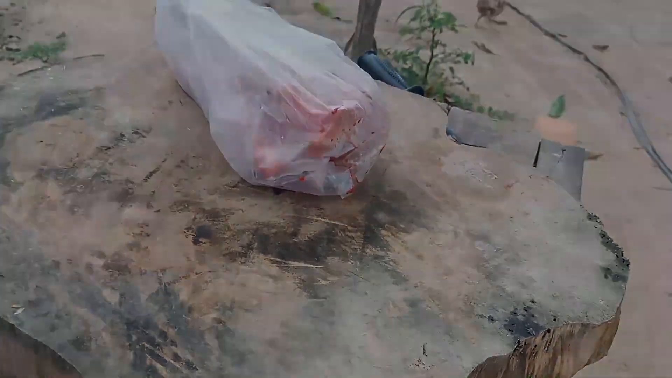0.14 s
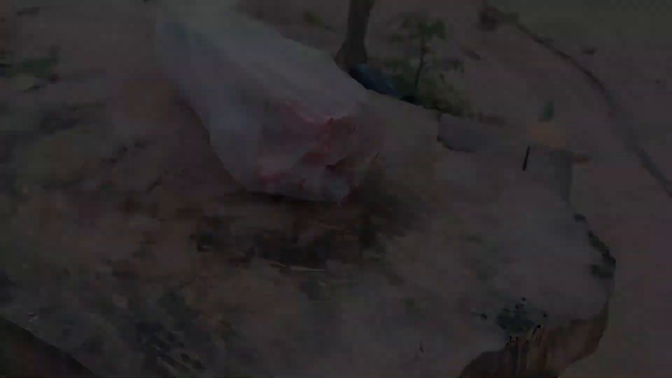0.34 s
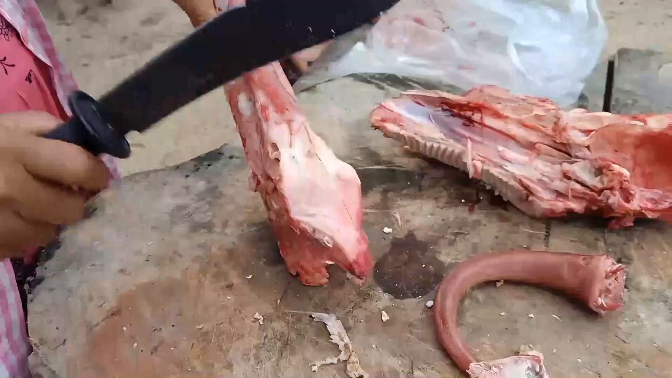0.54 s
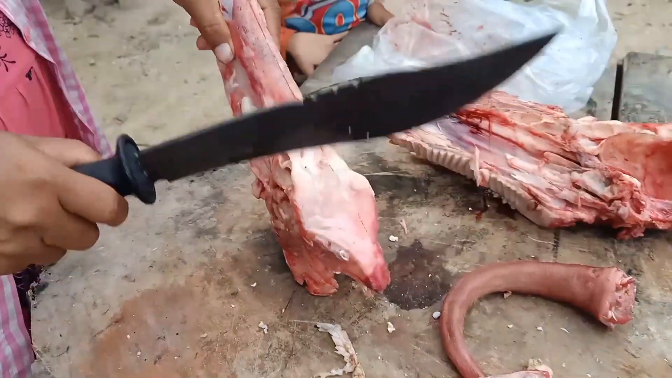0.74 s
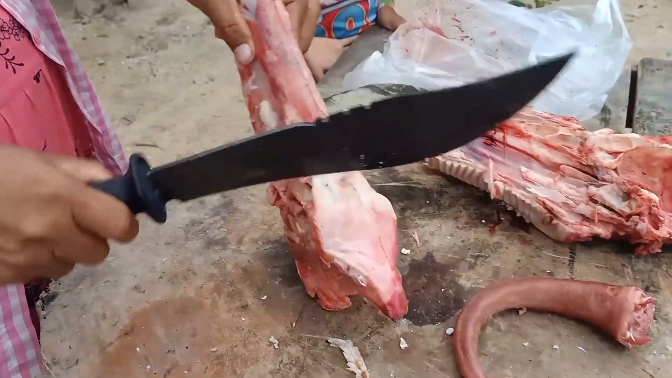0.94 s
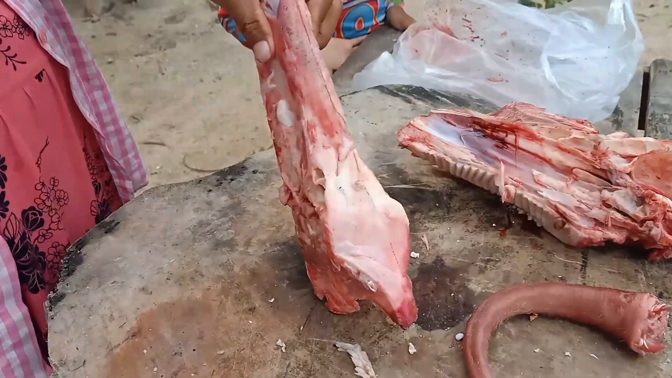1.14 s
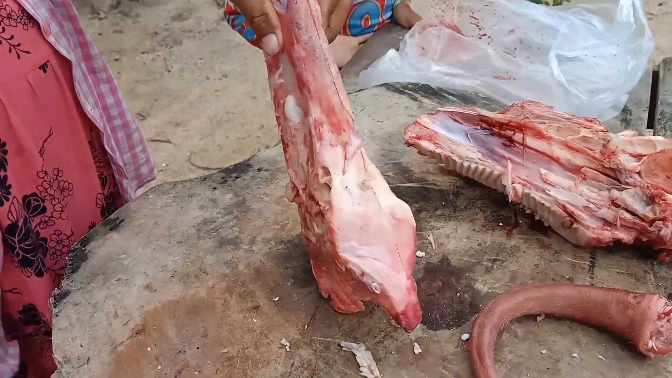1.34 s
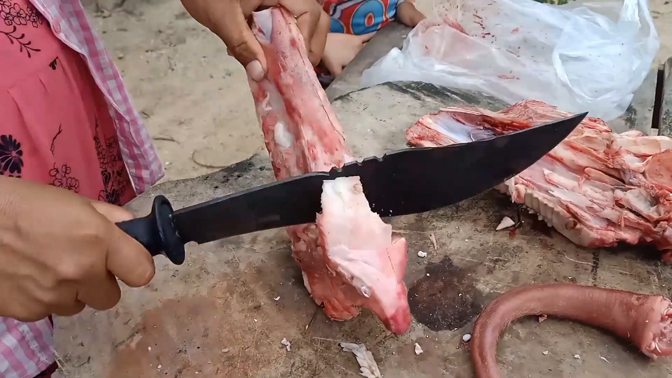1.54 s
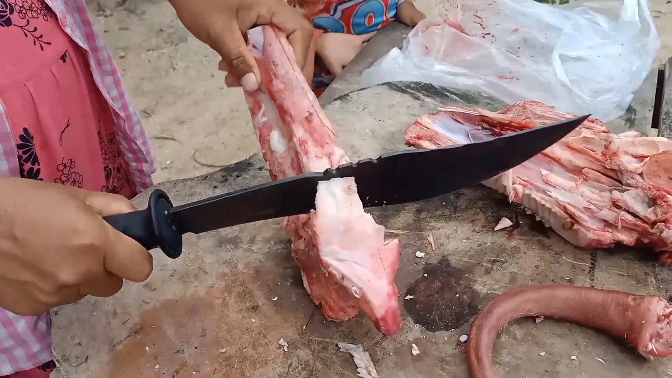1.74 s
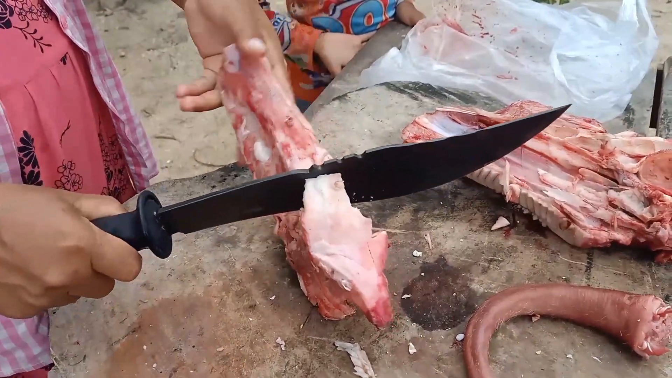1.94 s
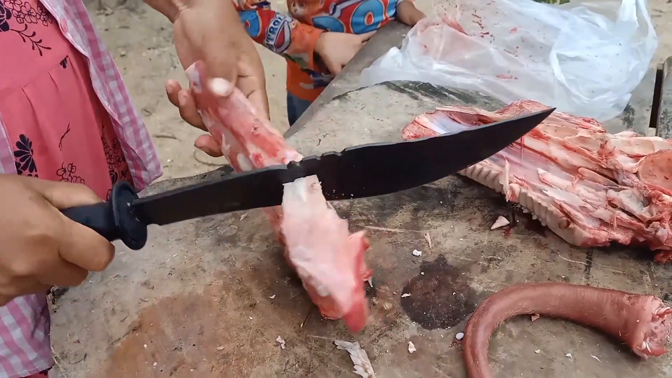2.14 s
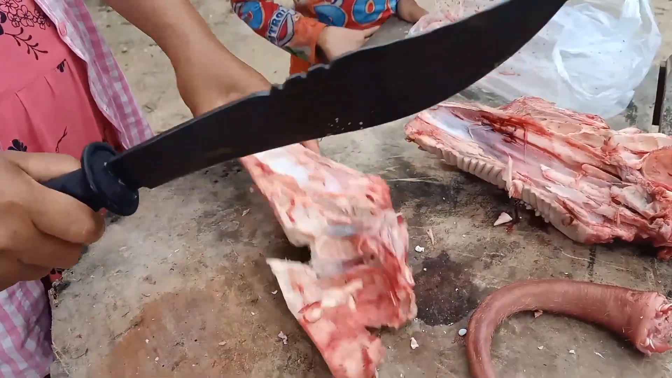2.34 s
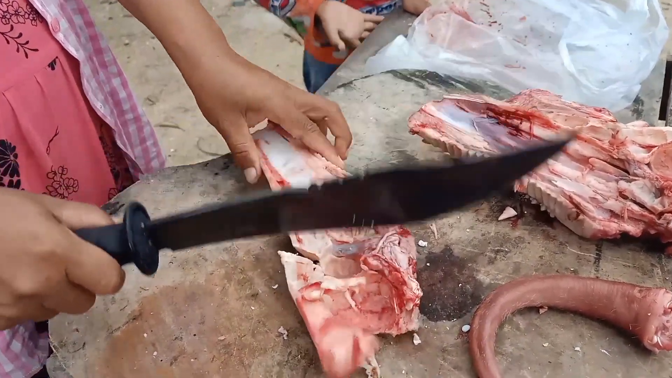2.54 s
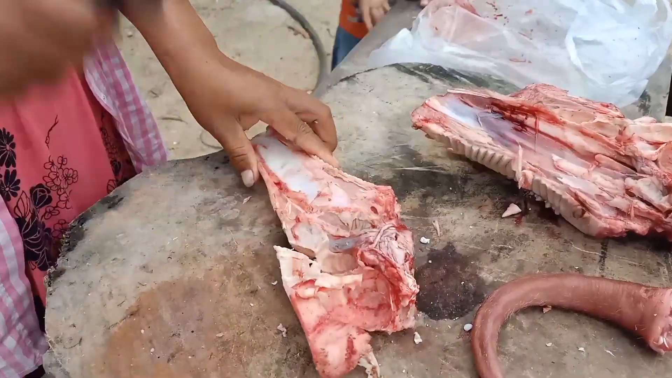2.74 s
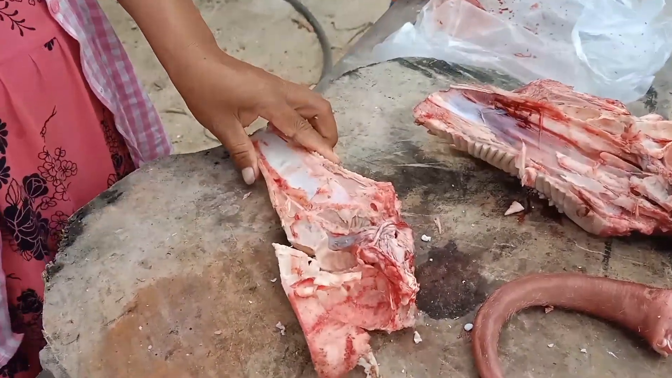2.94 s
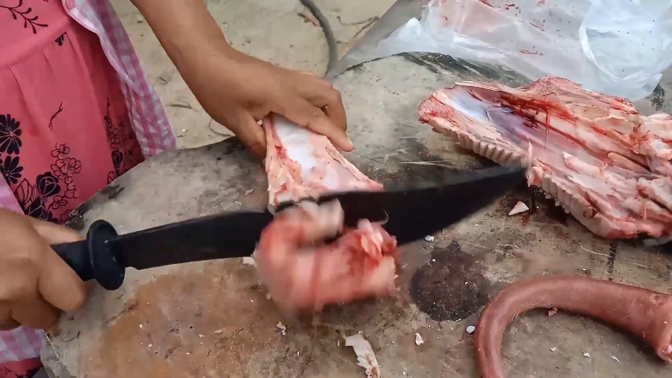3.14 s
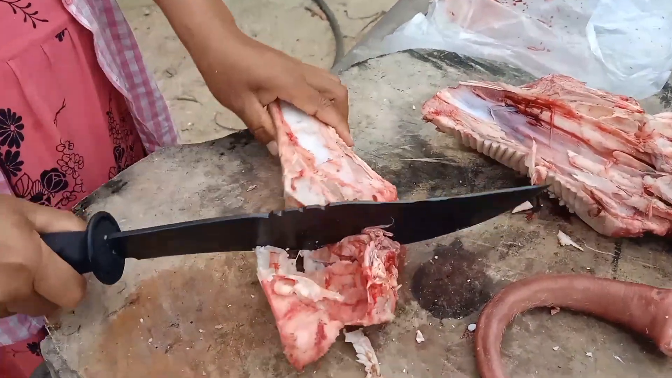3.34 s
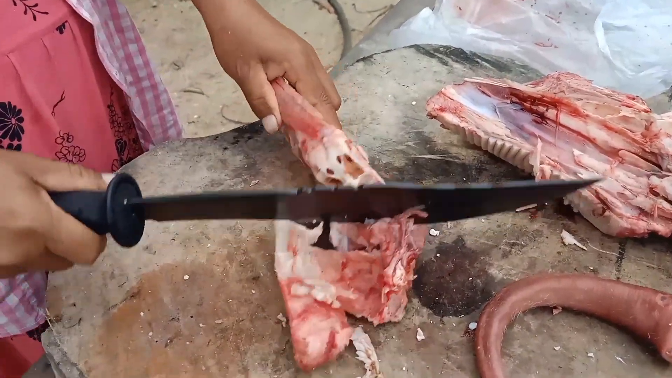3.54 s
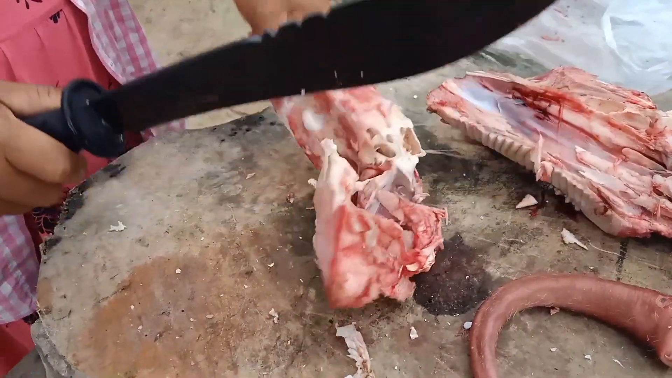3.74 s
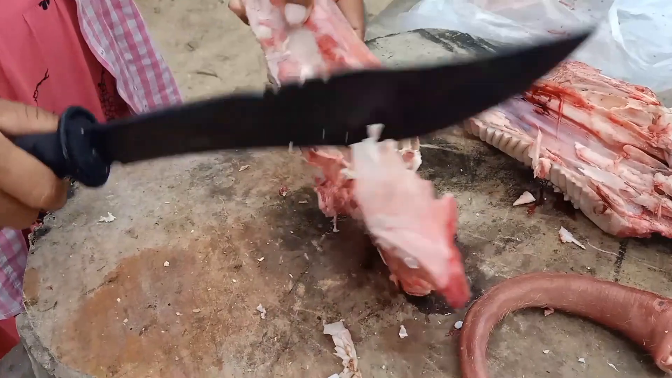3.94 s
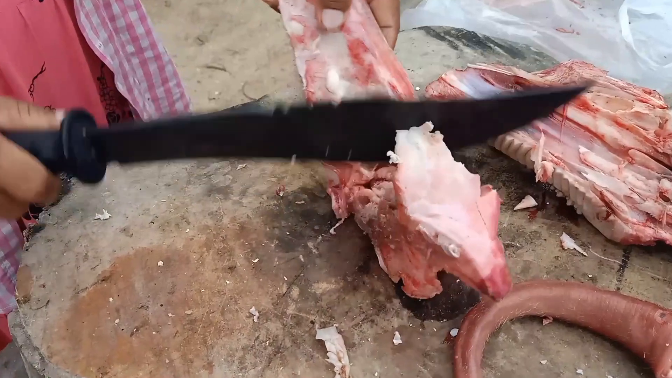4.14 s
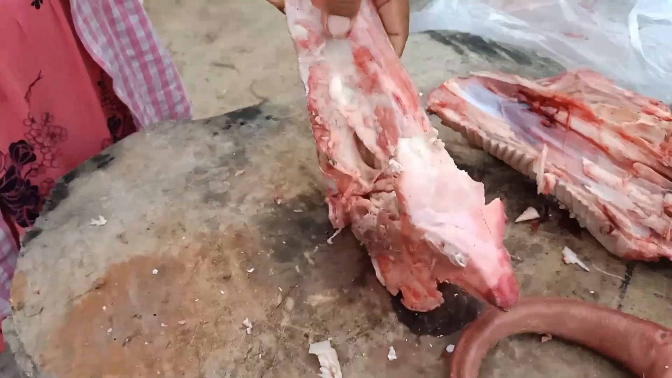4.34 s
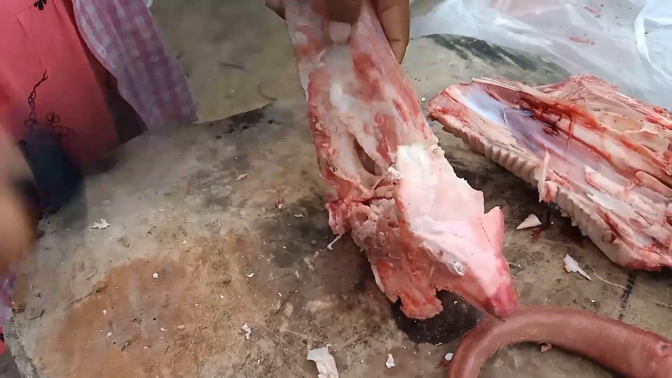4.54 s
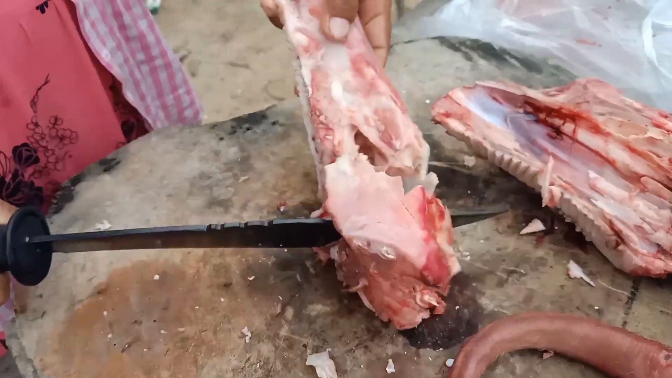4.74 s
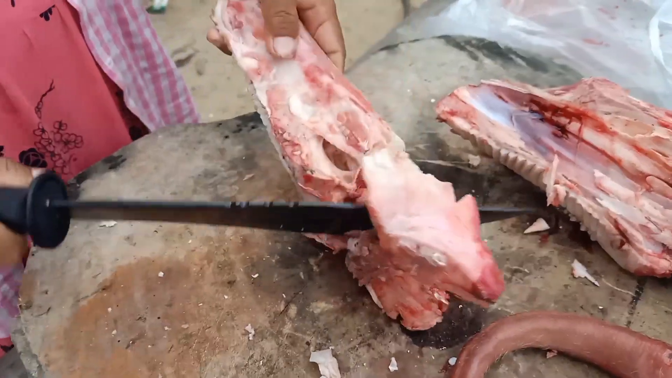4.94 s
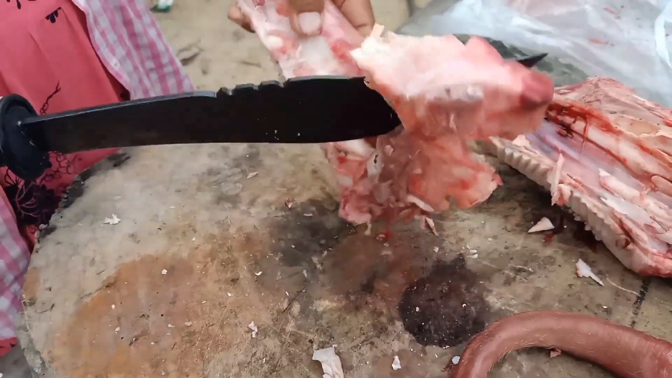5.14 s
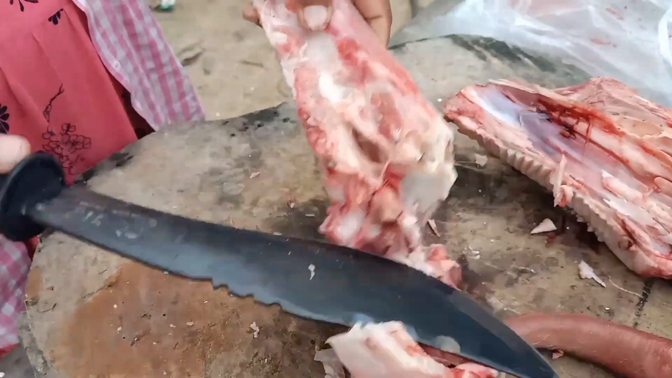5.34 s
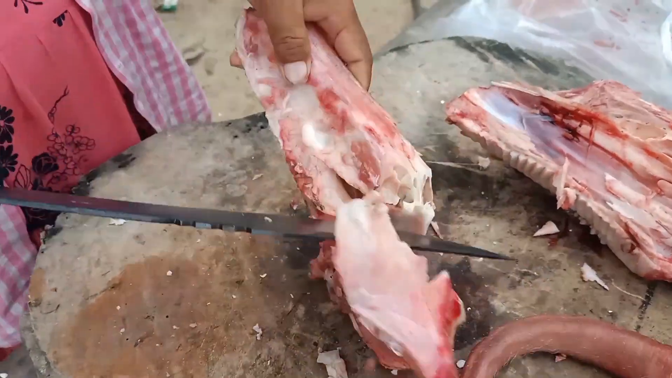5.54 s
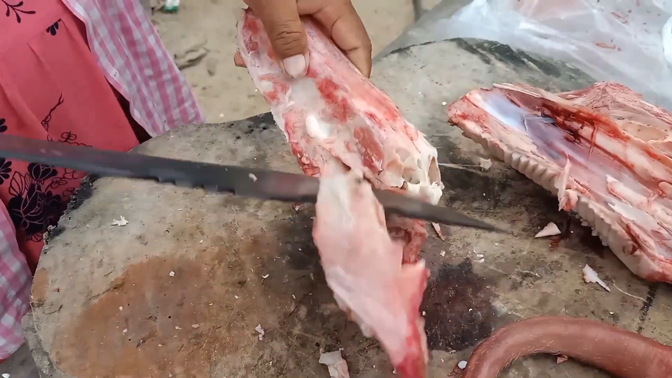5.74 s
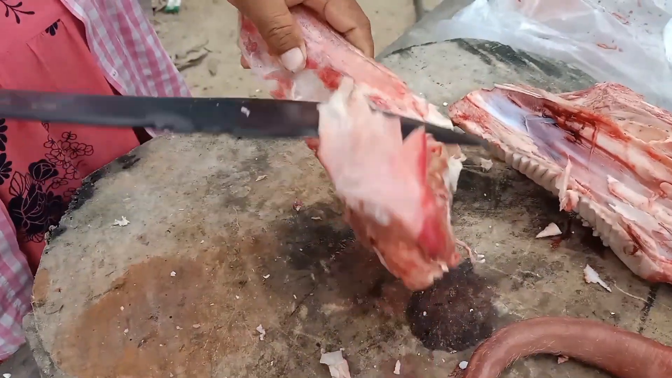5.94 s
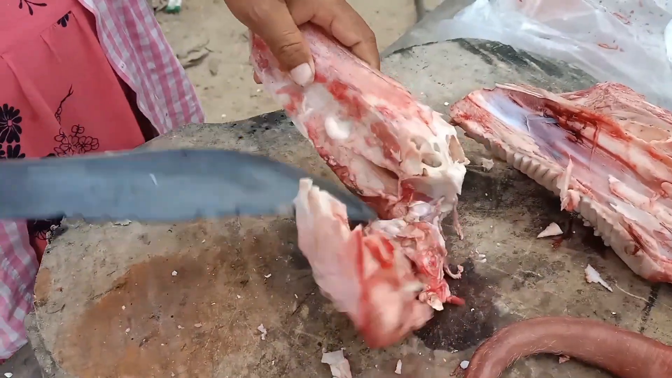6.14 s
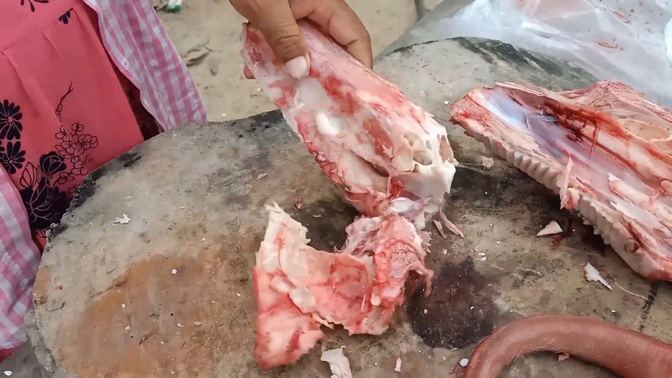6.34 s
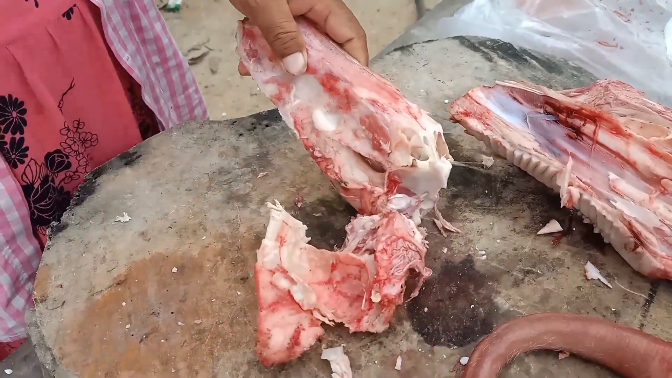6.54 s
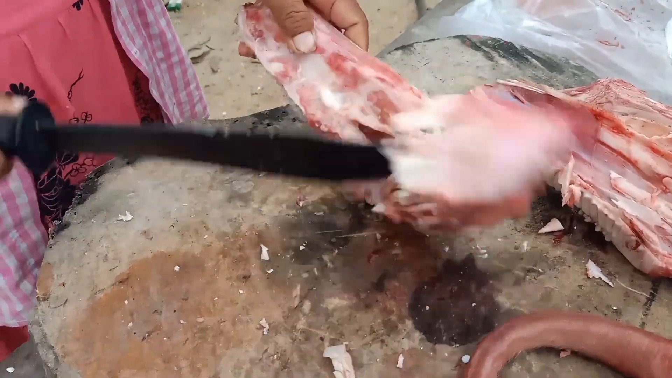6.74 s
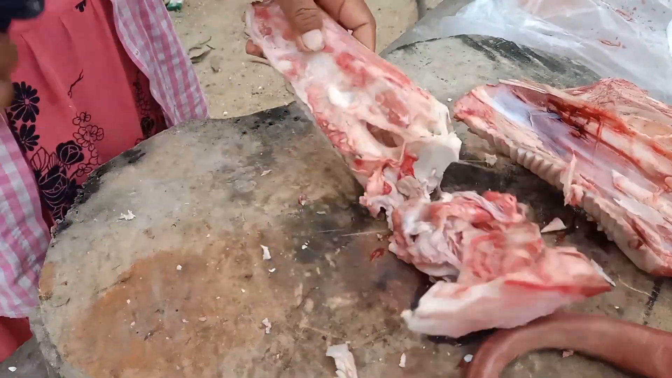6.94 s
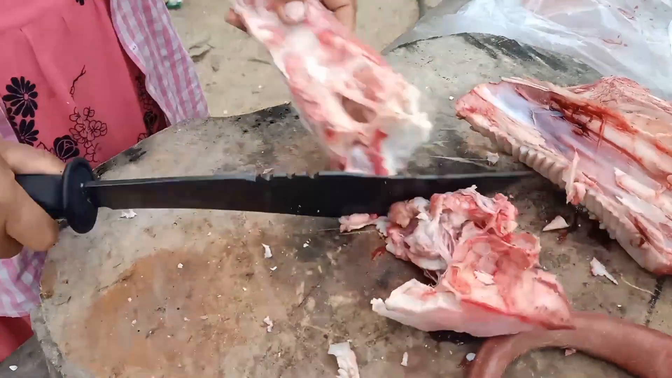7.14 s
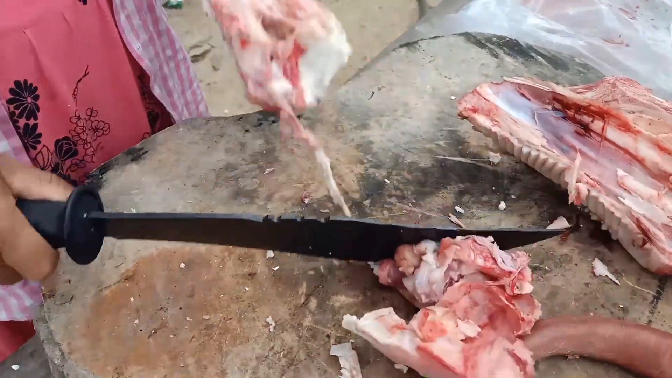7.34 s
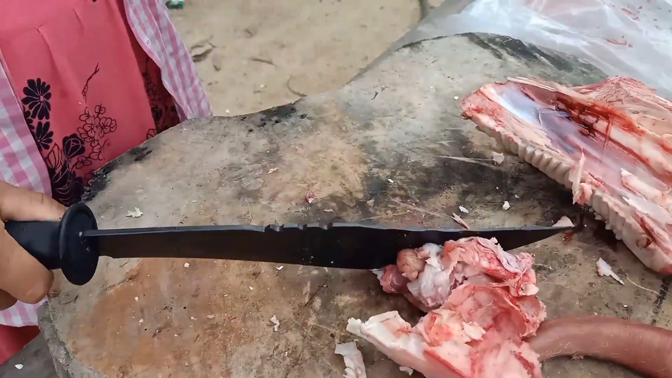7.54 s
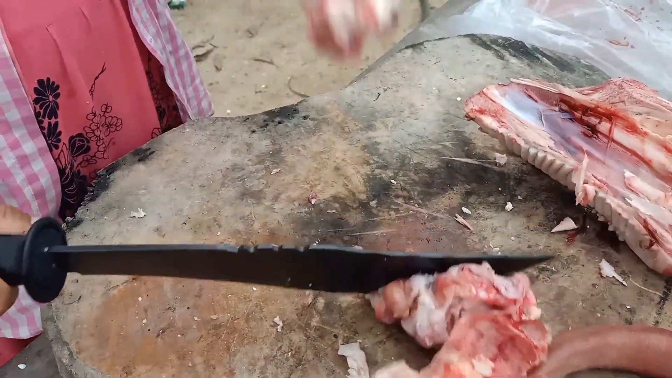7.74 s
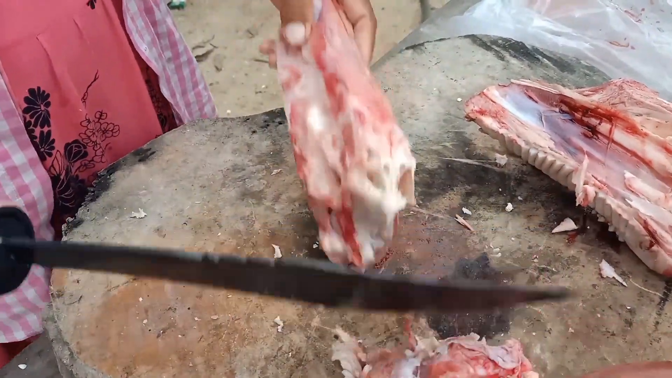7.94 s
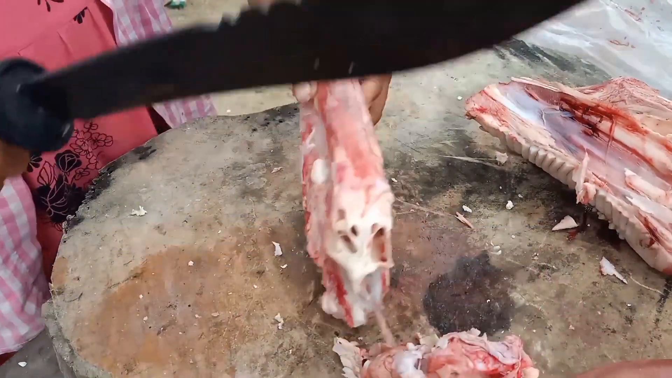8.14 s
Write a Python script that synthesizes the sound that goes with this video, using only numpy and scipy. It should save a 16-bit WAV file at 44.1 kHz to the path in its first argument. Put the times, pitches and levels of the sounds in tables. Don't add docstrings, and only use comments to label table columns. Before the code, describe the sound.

A heavy knife chops through meat and bone on a tree-stump block, sharp cracks and woody thuds, while chicks peep in an open yard.

```python
import sys
import numpy as np
from scipy import signal
from scipy.fft import rfft, irfft
from scipy.io import wavfile
from scipy.ndimage import uniform_filter1d

SR = 44100
rng = np.random.default_rng(int(sys.argv[2]) if len(sys.argv) > 2 else 0)


def generate_wav(signal):
    frames = np.transpose(np.atleast_2d(signal))
    scaled = np.clip(frames, -1, 1) * 32767
    pcm = np.round(scaled).astype(np.int16)
    wavfile.write(sys.argv[1], SR, pcm)


def ratio_of_db(decibels):
    return 10 ** (np.asarray(decibels, float) / 20)


N = 365588
T = np.arange(N) / SR
FADE_START_S, FADE_END_S = 0.422, 0.58
CUT_S = 0.645

# mode_hz, level_db, t60_s
GROUND_MODES = [(118, 0, 0.1), (168, 2, 0.083), (300.6, 0, 0.07)]


def coloured(x, points):
    hz, db = np.transpose(points)
    bins_hz = np.arange(1025) * SR / 2048
    log_gain = np.interp(np.log(bins_hz + 1), np.log(hz), db) * np.log(10) / 20
    cepstrum = irfft(log_gain)
    cepstrum[1:1024] *= 2
    response = irfft(np.exp(rfft(cepstrum[:1025], 2048)))
    return signal.fftconvolve(x, response / np.linalg.norm(response))[:len(x)]


def band(x, lo_hz, hi_hz):
    sos = signal.butter(2, [lo_hz, min(hi_hz, .45 * SR)], "band", fs=SR, output="sos")
    return signal.sosfilt(sos, x)


def ring(push, modes):
    out = 0
    for hz, db, t60 in modes:
        pole = np.exp(2j * np.pi * hz / SR - np.log(1000) / (t60 * SR))
        out = out + ratio_of_db(db) * signal.lfilter([1], [1, -pole], push).imag
    return out


def blows(seconds, db, contact_ms):
    push = np.zeros(N)
    np.add.at(push, (np.asarray(seconds) * SR).astype(int), ratio_of_db(np.asarray(db)))
    shape = np.hanning(max(int(contact_ms * SR / 1000), 1) + 2)
    return np.convolve(push, shape / shape.sum())[:N]


def burst(start_s, db, length_ms, grit_db, bands):
    u = np.arange(2048) / (max(length_ms, .3) * SR / 1000)
    unevenness = np.repeat(rng.standard_normal(128), 16)
    grains = ratio_of_db(grit_db * unevenness) * rng.standard_normal(2048)
    piece = ratio_of_db(db) * grains * np.minimum(u * 12, 1) * np.exp(-u ** 8.1)
    out, i = np.zeros(N), int(start_s * SR)
    out[i:i + len(u)] = sum(ratio_of_db(share_db) * band(piece, lo_hz, hi_hz) for lo_hz, hi_hz, share_db in bands)
    return out


def walk(rate_hz):
    hold = int(SR / rate_hz)
    steps = np.repeat(rng.standard_normal(N // hold + 1), hold)
    return 1.6 * uniform_filter1d(uniform_filter1d(steps, hold), hold)[:N]


def ports(x, lag):
    return np.array([np.roll(x, lag), x])


def two_paths(x, late):
    left = np.sqrt(1 - late) * np.roll(x, 2) + np.sqrt(late) * np.roll(x, 20)
    return np.array([left, x])


def echo(x, db, delay_s, t60):
    t = np.arange(SR // 2) / SR
    envelope = np.clip(t / delay_s, 0, 1) ** 2 * np.exp(-np.log(1000) * t / t60)
    tail = rng.standard_normal((2, len(t))) * envelope
    return ratio_of_db(db) * signal.fftconvolve(x[None], tail / np.linalg.norm(tail[0]), axes=1)[:, :N]


def cracks():
    # start_s, peak_db, length_ms, top_end_db, low_end_db
    chops = [
        (0.755, -15.5, 6.4, 0, 2.5),
        (1.0173, -23, 7.6, 1.5, -2),
        (1.5604, 4.5, 8.4, -1, 0.5),
        (2.6677, -19, 4.3, 1, -2.5),
        (3.2133, 3, 7.6, 1, 2),
        (4.662, -12, 4.5, 1.5, -1),
        (4.6659, -5, 5.2, -1, -0.5),
        (6.7429, -1, 8.3, 0.5, 2.5),
        (7.1252, -11.5, 6.4, 2.5, -3),
        (7.1322, -14, 7, 0, -1),
    ]
    # freq_hz, density_db (per Hz)
    crack_colour = [(88, -38), (150, -7.5), (259, -8.5), (1080, -7), (1760, -7), (2140, -2.5), (2810, -7),
                    (3160, -6), (4410, -15), (5790, 6), (7040, -17.5), (10400, -26), (12400, -28.5),
                    (14000, -23), (16000, -36.5)]
    x = 0
    for s, db, ms, top_db, low_db in chops:
        bands = [(204, 1600, low_db), (1800, 4800, 0), (6830, 13000, top_db)]
        x = x + burst(s, db - 1, ms, 4.6, bands)
    x = coloured(x, crack_colour)
    dull = band(x, 200, 7500) * ratio_of_db(6.1 * walk(150))
    return two_paths(x, 0.43) + echo(dull, -25, .03, .28) + echo(x, -20, .003, .04)


def thuds():
    # start_s, peak_db, upper_modes_db, thump_db
    strikes = [(0.756, -17, -3, -18), (1.021, -16.5, 0, -19), (1.56, -16.5, 0, -8.5),
               (2.472, -39, -6.5, -19.5), (2.667, -34.5, 0.5, -18), (3.215, -7, -5, -14.5),
               (4.664, -11.5, -8, -20.5), (4.669, -7, -5.5, -21.5), (5.454, -42.5, -2, -17),
               (6.154, -19, -3.5, -21), (6.478, -36.5, -2, -29), (6.743, -8, 0, -27.5),
               (6.935, -28, -6.5, -19), (7.126, -20, -5.5, -13.5), (7.132, -4.5, 0.5, -27.5)]
    # mode_hz, level_db, t60_s
    block_modes = [(528.5, 1, 0.11), (680.6, 1.5, 0.036), (793, -2, .03), (1090, -9, 0.04),
                   (1335, -5, 0.026)]
    s, db, upper_db, thump_db = np.transpose(strikes)
    since_s = np.maximum(T - s[np.maximum(np.searchsorted(s, T) - 1, 0)], 0)
    note = ring(blows(s, db, 1.0), block_modes[:1]) * np.exp(-(since_s / 0.042) ** 3.0)
    upper = ring(blows(s, db + upper_db, .4), block_modes[1:])
    x = band(note + upper, 380, 4000)
    thump = ring(blows(s + .002, db + thump_db, 1.1), GROUND_MODES)
    return ports(x, lag=3) + ports(thump, lag=16) + echo(x, -24.5, 0.044, .2)


def knocks():
    # start_s, peak_db
    contacts = [(0.843, -24.5), (0.933, -30.5), (1.067, -27.5), (1.12, -44), (1.225, -36.5), (1.292, -39),
                (1.609, -30.5), (1.69, -23.5), (1.852, -20), (1.963, -34), (2.076, -26.5), (2.143, -39),
                (2.203, -38.5), (3.262, -26.5), (3.31, -23.5), (3.355, -42.5), (3.397, -40.5),
                (3.444, -22.5), (3.623, -48), (3.738, -43.5), (4.111, -37.5), (4.765, -21), (4.807, -34.5),
                (4.842, -36), (4.938, -31), (5.058, -43), (5.083, -35.5), (5.131, -43), (5.7, -40.5),
                (6.394, -49), (6.879, -20.5), (7.032, -29), (7.36, -27.5), (7.606, -37.5)]
    # mode_hz, level_db, t60_s
    wood_modes = [(788, 5.5, 0.029), (457, -8.5, 0.013), (1000, -6, 0.045), (1345, -13.5, 0.027)]
    s, db = np.transpose(contacts + [(7.106, -39.5)])
    heel = blows(s, db - 5.5, 0.98)
    toe = blows(s + 0.00427, db - 2.5, 0.94)
    x = band(ring(heel + toe, wood_modes), 330, 3000)
    x = x + ring(blows(s + 0.0031, db - 20.5, 1.7), GROUND_MODES)
    return ports(x, lag=3) + echo(x, -12.5, 0.011, 0.094)


def ticks():
    # start_s, peak_db, centre_hz
    clicks = [(1.2229, -39.5, 3940), (1.2661, -32.5, 3830), (1.8123, -49, 5890), (1.8914, -41, 2340),
              (2.4734, -38, 3600), (2.4887, -35.5, 2720), (2.7364, -41.5, 3900), (3.1154, -34.5, 3880),
              (3.3204, -32.5, 2650), (3.3973, -46.5, 1860), (3.5498, -44, 5800), (4.1191, -39.5, 5450),
              (4.1339, -37.5, 3970), (4.696, -24, 2470), (4.79, -46, 5190), (4.8473, -33, 2250),
              (5.0854, -27, 1450), (5.443, -24, 2550), (5.468, -29.5, 4600), (5.7004, -38, 2900),
              (6.0955, -38.5, 2330), (6.1324, -40.5, 5750), (6.1543, -24.5, 2120), (6.1812, -39, 2980),
              (6.2254, -40, 2500), (6.2784, -25, 2780), (6.8523, -25, 2410), (6.8743, -27, 2800),
              (6.8985, -30.5, 4860), (6.9345, -29.5, 1520), (6.9573, -40, 1500), (6.958, -40, 1520),
              (7.0217, -34.5, 2510)]
    x = 0
    for s, db, hz in clicks:
        x = x + burst(s, db - 2, 2.9, 3.5, [(hz / 1.9, hz * 1.45, 0), (5000, 15000, -18)])
    return two_paths(x, .6) + echo(x, -8, .004, 0.039)


def blade():
    # start_s, peak_db
    touches = [(1.022, -42), (1.562, -13), (2.29, -61.5), (3.216, -38.5), (3.746, -53), (4.29, -56.5),
               (6.10, -57), (6.155, -47.5), (6.744, -41), (6.901, -47.5), (7.134, -38.5), (7.312, -56),
               (7.354, -54), (7.393, -48.5)]
    # mode_hz, level_db, t60_s
    blade_modes = [(5850, 4.5, 0.051), (5750, -9.5, 0.095)]
    s, db = np.transpose(touches)
    return ports(ring(blows(s, db, .03), blade_modes), lag=1)


def add_call(out, call, partials_db, slew_ms, flutter):
    s, hz, db = np.transpose(call)[:3]
    i = np.arange(int((s[0] - .01) * SR), min(int((s[-1] + 0.0093) * SR), N))
    t = i / SR
    pitch = uniform_filter1d(np.interp(t, s, hz), int(slew_ms * SR / 1000), mode="nearest")
    pitch = pitch * (1 + .004 * np.log(flutter[i]))
    phase = 2 * np.pi * np.cumsum(pitch) / SR
    ends = np.clip(np.minimum(t - t[0], t[-1] - t) / 0.0086, 0, 1) ** 2
    voice = sum(ratio_of_db(level_db(t)) * np.sin(k * phase) for k, level_db in partials_db)
    out[i] += np.sqrt(2) * ratio_of_db(np.interp(t, s, db)) * ends * flutter[i] * voice


def chicks():
    # time_s, pitch_hz, level_db
    peeps = [
        [(0.088, 4100, -63), (0.12, 3740, -45), (0.133, 3476, -30), (0.165, 3050, -32.5), (0.182, 2620, -45)],
        [(0.45, 4400, -74), (0.5, 3760, -53), (0.512, 3454, -36), (0.54, 3200, -39), (0.557, 2660, -48)],
        [(0.648, 3900, -50), (0.675, 2960, -49)],
        [(0.788, 3800, -65), (0.823, 4050, -52.5), (0.858, 3760, -60.5), (0.873, 2730, -54)],
        [(1.155, 3700, -67), (1.175, 4120, -53), (1.23, 3990, -47.5), (1.28, 3800, -43.5), (1.302, 2830, -42.5)],
        [(1.293, 3800, -48.5), (1.313, 3330, -40), (1.333, 2320, -45.5)],
        [(1.365, 3300, -55), (1.385, 3000, -52), (1.402, 2480, -51)],
        [(1.906, 3330, -62.5), (1.928, 2900, -51), (1.956, 1830, -64)],
        [(2.24, 3710, -64), (2.28, 3990, -57.5), (2.325, 3880, -69)],
        [(2.289, 3990, -52), (2.324, 2940, -45.5), (2.339, 2660, -60)],
        [(2.355, 2900, -52), (2.375, 2240, -56)],
        [(2.335, 4700, -66), (2.4, 4880, -60), (2.44, 4560, -73), (2.47, 3700, -46), (2.5, 2590, -55)],
        [(2.68, 3840, -54.5), (2.74, 4010, -52), (2.785, 3810, -46), (2.812, 2950, -41.5)],
        [(2.835, 3100, -53), (2.855, 2835, -45), (2.868, 2330, -55)],
        [(3.03, 2910, -42.5), (3.05, 2470, -55)],
        [(3.04, 3880, -54), (3.075, 3550, -50)],
        [(3.113, 3780, -55), (3.158, 4050, -50.5), (3.193, 3740, -55), (3.22, 3400, -60)],
        [(3.878, 3910, -59), (3.903, 2470, -59)],
        [(4.076, 3400, -54.5), (4.093, 2040, -59.5)],
        [(4.467, 3370, -53.5), (4.492, 2490, -54)],
        [(4.54, 3690, -63.5), (4.56, 3760, -61), (4.58, 3010, -54), (4.6, 2070, -62)],
        [(4.602, 4700, -63), (4.672, 4960, -55)],
        [(4.72, 3260, -52), (4.735, 2580, -51)],
        [(5.437, 3170, -50), (5.452, 2110, -53)],
        [(5.478, 4200, -55), (5.528, 4230, -67.5), (5.548, 3640, -53.5), (5.57, 2400, -54.5)],
        [(5.596, 3200, -64), (5.616, 2430, -58)],
        [(5.775, 2940, -49), (5.79, 2250, -53.5)],
        [(5.795, 3030, -64.5), (5.806, 2300, -60)],
        [(6.017, 3200, -53), (6.037, 2310, -59)],
        [(6.345, 3300, -50.5), (6.365, 2320, -54)],
        [(6.448, 3130, -49), (6.46, 2440, -50)],
        [(6.495, 3100, -55), (6.506, 2580, -57)],
        [(6.546, 3230, -47), (6.561, 2230, -48)],
        [(6.68, 3190, -51), (6.697, 2120, -54.5)],
        [(7.3, 4200, -70), (7.37, 4120, -57), (7.395, 3200, -48.5), (7.415, 2400, -52)],
        [(7.44, 4330, -61.5), (7.5, 4050, -59.5), (7.52, 3570, -45), (7.535, 2590, -45.5)],
        [(7.6, 4970, -66), (7.68, 4720, -67), (7.72, 3960, -60), (7.755, 2250, -53.5)],
        [(7.73, 4040, -60), (7.82, 3930, -54), (7.85, 2990, -54.5), (7.87, 2400, -61.5)],
        [(8.01, 4460, -68.5), (8.15, 4460, -59.5), (8.21, 4290, -63), (8.235, 3600, -51), (8.25, 2570, -48.5)],
        [(8.252, 3230, -44), (8.27, 2600, -51)],
    ]
    # level_db, then a list of time_s, pitch_hz
    far_peeps = [(-67.5, [(.83, 5100), (.985, 4200), (1.018, 3460)]), (-71, [(1.46, 4350), (1.53, 4470)]),
                 (-58, [(1.79, 4160), (1.82, 3120)]), (-57.5, [(1.992, 3780), (2.045, 4110), (2.1, 3820),
                 (2.115, 3000)]), (-69, [(2.14, 4600), (2.235, 3850), (2.255, 2510)]), (-63, [(3.415, 3950),
                 (3.445, 4100), (3.5, 3770), (3.52, 2730)]), (-64.5, [(3.71, 4170), (3.75, 4150),
                 (3.797, 2470)]), (-58.5, [(3.835, 4060), (3.94, 3460), (4.0, 1800)]), (-60, [(4.018, 3600),
                 (4.05, 4240), (4.11, 3770)]), (-63, [(4.374, 4190), (4.449, 4240), (4.499, 1800)]),
                 (-54, [(4.38, 5170), (4.43, 5010)]), (-60, [(4.6, 5200), (4.66, 5150)]),
                 (-63.5, [(5.1, 4240), (5.23, 3970), (5.268, 2620)]), (-61.5, [(5.37, 4680), (5.41, 4940),
                 (5.435, 4650)]), (-67.5, [(5.89, 3900), (5.96, 4010), (6.02, 3390)]),
                 (-65.5, [(6.02, 5030), (6.11, 4260)]), (-64, [(6.2, 3950), (6.32, 3790), (6.348, 3230)]),
                 (-67.5, [(6.3, 4400), (6.42, 4610), (6.53, 4130), (6.55, 3260)]), (-62.5, [(6.62, 4760),
                 (6.67, 4950), (6.73, 4750)]), (-68.5, [(6.92, 4200), (6.99, 4020), (7.02, 3240)]),
                 (-65, [(7.31, 4500), (7.44, 4500), (7.52, 4200)]), (-67, [(7.868, 4570), (7.918, 4440),
                 (7.943, 4020)])]
    near, flock = np.zeros(N), np.zeros(N)
    flutter = ratio_of_db(3.6 * walk(90))
    whistle = [(1, lambda t: 0), (2, lambda t: -32)]
    far_calls = [[(s, hz, db) for s, hz in line] for db, line in far_peeps]
    for call in peeps + far_calls:
        add_call(near, call, whistle, 8, flutter)
    for when, high, length, size in rng.random((140, 4)):
        s, hz, db = 0.056 + 8.0 * when, 2900 + 1300 * high, -71 + 7 * size
        call = [(s, hz, db - 4.5), (s + 0.059 * length, hz, db), (s + 0.044 * length + 0.034, 2300, db)]
        add_call(flock, call, whistle, 8, flutter)
    near = ports(near, lag=21) + echo(near, -8.5, .012, .13)
    return near + ports(flock, lag=17) + echo(flock, -2, .02, 0.19)


def hen():
    # time_s, pitch_hz, level_db, overtones_db
    croons = [
        [(1.13, 488.6, -69, 0), (1.18, 558, -60.5, 4), (1.25, 632, -52.5, 0), (1.36, 680, -49.5, -13),
         (1.45, 707.4, -48.5, -10.5), (1.55, 720, -53, -15)],
        [(2.56, 269, -63.5, -26), (2.72, 304, -50.5, -24)],
        [(2.88, 634, -56.5, 3), (2.93, 622, -64, -2)],
        [(2.94, 488, -64, -5), (3.04, 529, -62.5, -1), (3.12, 603, -54.5, 0), (3.21, 621, -57, -13)],
        [(6.54, 896, -62.5, -11), (6.65, 792, -60.5, -16)],
    ]
    x = np.zeros(N)
    throat = 1 + 0.83 * np.sin(2 * np.pi * 26 * T + 1.9 * walk(6.7))
    roll = throat * ratio_of_db(2.0 * walk(60))
    for call in croons:
        s, _, _, over_db = np.transpose(call)
        partials = [(1, lambda t: 0 * t),
                    (2, lambda t: np.interp(t, s, over_db)),
                    (3, lambda t: np.interp(t, s, over_db) - 10)]
        add_call(x, call, partials, 30, roll)
    return ports(x, lag=20) + echo(x, -7, .02, 0.22)


def motor():
    firing_hz = [115.7, 79]
    # multiple, level_db
    hum = [(1, -63.5), (2, -59), (3, -69.5)]
    rate_hz = np.where(T < CUT_S, *firing_hz) * (1 + 0.016 * walk(21))
    phase = 2 * np.pi * np.cumsum(rate_hz) / SR
    return ports(sum(ratio_of_db(db + 1.5 * walk(6.7)) * np.sin(k * phase) for k, db in hum), lag=14)


def yard():
    # time_s, rumble_db, leaves_db, far_flock_db, hiss_db
    shots = [
        [(0, -52, -59.5, -60, -57), (.2, -56, -61.5, -60.5, -60.5), (.35, -63.5, -73, -62.5, -67.5),
         (.5, -65.5, -76, -64.5, -64)],
        [(.66, -55.5, -56.5, -57, -62), (.87, -57, -63, -72.5, -64.5), (1.18, -57.5, -64.5, -76, -65.5),
         (1.25, -60, -60, -55.5, -58.5), (1.45, -60.5, -59.5, -64.5, -70), (1.9, -54.5, -75, -68.5, -69.5),
         (2.35, -60, -61.5, -69, -65.5), (2.6, -61.5, -61, -67.5, -69), (3.7, -64.5, -68, -66.5, -71.5),
         (3.85, -58, -65.5, -55, -65.5), (4.05, -63, -62.5, -72.5, -64), (4.6, -58, -64, -66, -66),
         (5.0, -57, -58.5, -68, -65), (5.6, -64.5, -65.5, -66.5, -65.5), (6.5, -60, -65.5, -66.5, -66),
         (8.29, -56, -60, -66, -64)],
    ]
    # freq_hz, density_db (per Hz)
    air_colour = [(18, -44), (30, -13), (59, -7.5), (153, -1), (215, -9), (844, -18), (1190, -19.5),
                  (2680, -18.5), (3400, -28.5), (3980, -25), (4420, -28.5), (5900, -30), (9710, -57),
                  (13700, -43.5), (16000, -64.5)]
    s, *levels = np.transpose(shots[0] + shots[1])
    # Hz, Hz, likeness of the ports 0-1, flicker dB
    layers = [(25, 470, 0.99, 0.68), (428, 1740, 0.65, 2.6), (1570, 3600, 0.28, 2.5), (3600, 7300, 0.19, 2.4)]
    out = 0
    for db, (lo_hz, hi_hz, alike, flicker_db) in zip(levels, layers):
        shared, left, right = (band(coloured(rng.standard_normal(N), air_colour), lo_hz, hi_hz)
                               for _ in range(3))
        pair = np.sqrt(alike) * ports(shared, lag=17) + np.sqrt(1 - alike) * np.array([left, right])
        level_db = 4 + np.interp(T, s, db) + flicker_db * walk(14) + 1.9 * walk(3.6)
        out = out + pair / pair.std() * ratio_of_db(level_db)
    return out


def phone_hiss():
    hiss = np.array([band(rng.standard_normal(N), 9500, 15000) for _ in range(2)])
    return ratio_of_db(-89.5 + 4.0 * walk(6)) * hiss


def scene():
    chopping = cracks() + thuds() + knocks() + ticks() + blade()
    return chopping + chicks() + hen() + motor() + yard() + phone_hiss()


def top_cut(x):
    return signal.sosfilt(signal.butter(12, 16510, fs=SR, output="sos"), x)


def record(dry):
    fade = np.clip((FADE_END_S - T) / (FADE_END_S - FADE_START_S), 0, 1)
    shots = np.where(T < CUT_S, fade, 1) * dry
    heard = signal.sosfilt(signal.butter(2, 75, "high", fs=SR, output="sos"), shots)
    return top_cut(np.tanh(heard * 0.96))


dry = scene()
out = record(dry)
generate_wav(out)
```